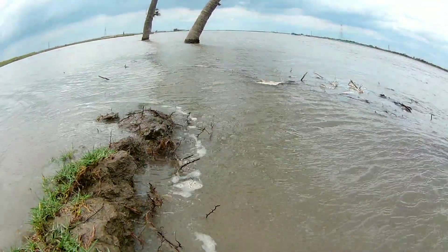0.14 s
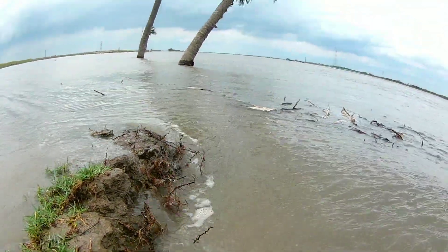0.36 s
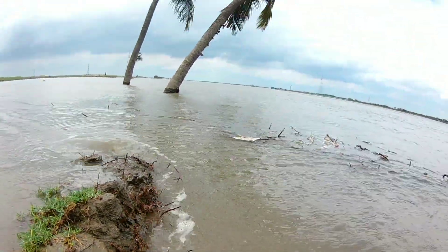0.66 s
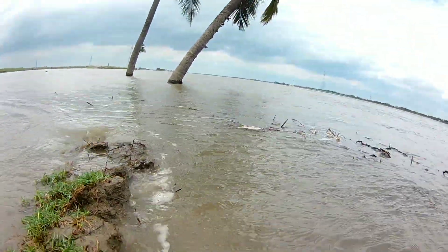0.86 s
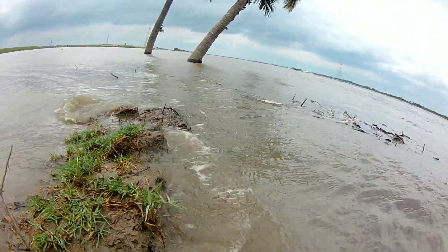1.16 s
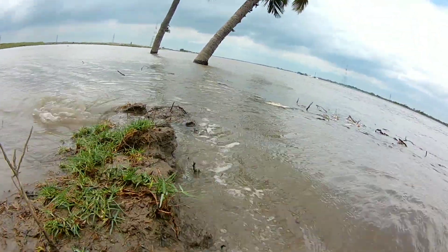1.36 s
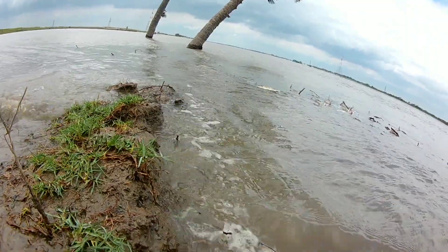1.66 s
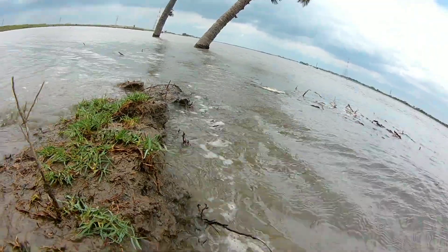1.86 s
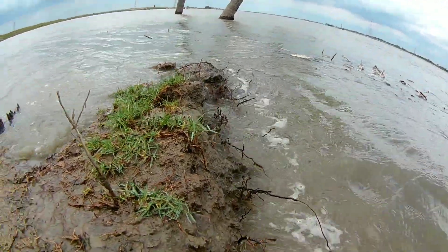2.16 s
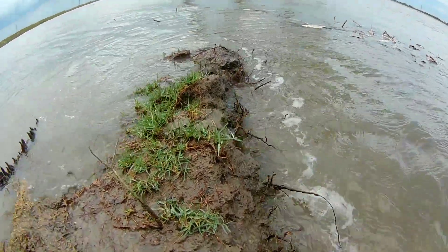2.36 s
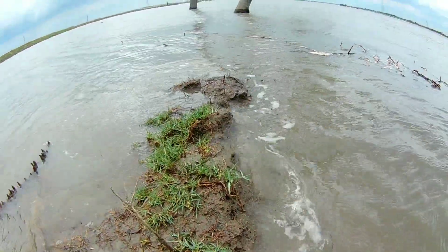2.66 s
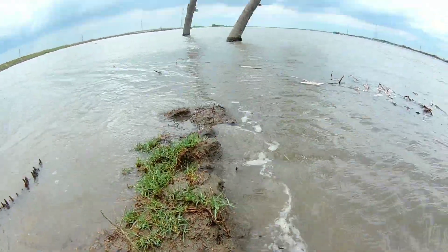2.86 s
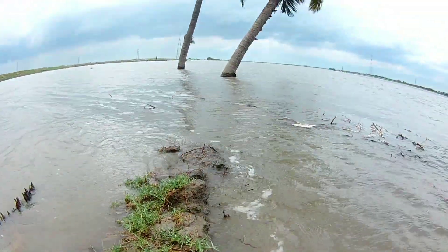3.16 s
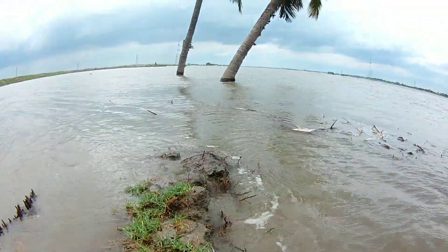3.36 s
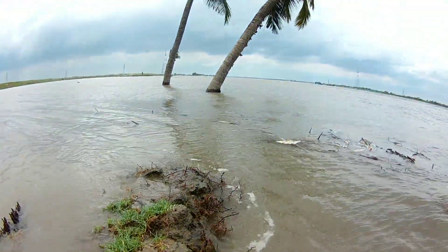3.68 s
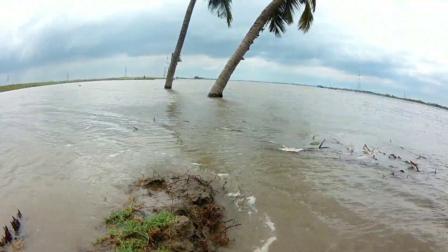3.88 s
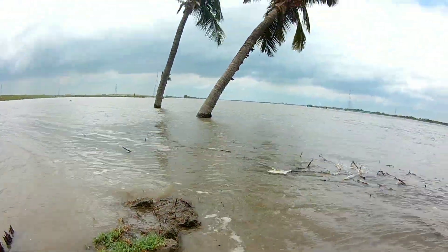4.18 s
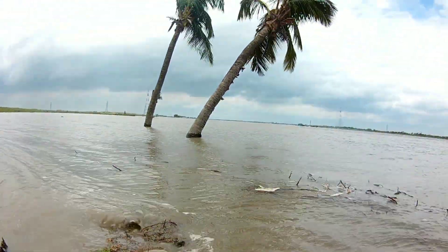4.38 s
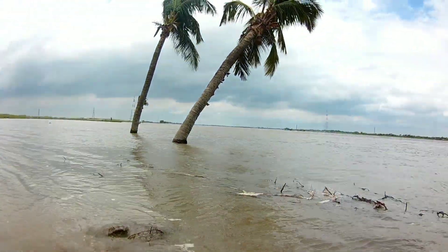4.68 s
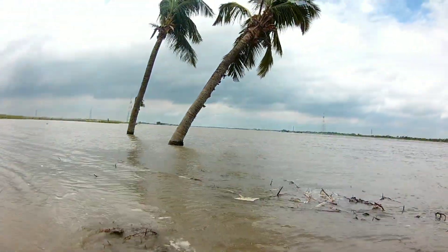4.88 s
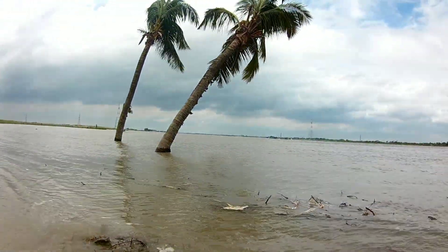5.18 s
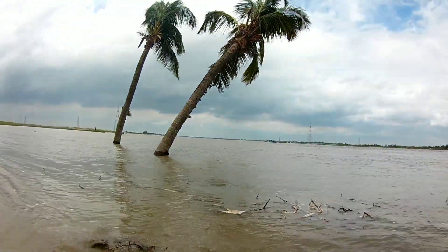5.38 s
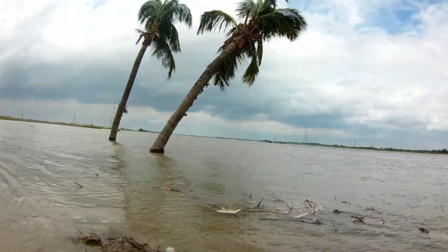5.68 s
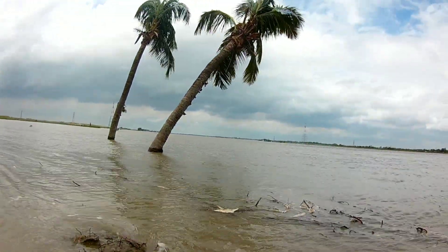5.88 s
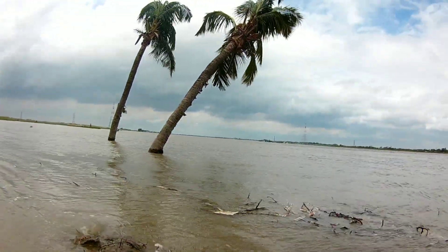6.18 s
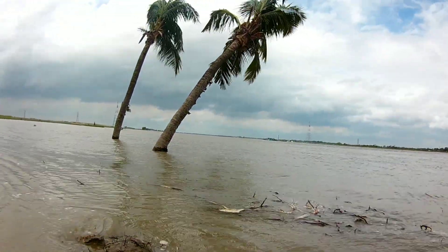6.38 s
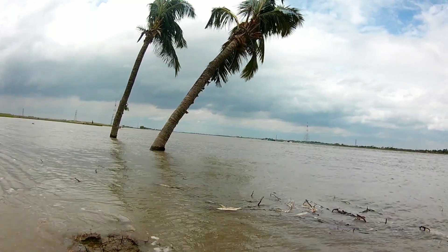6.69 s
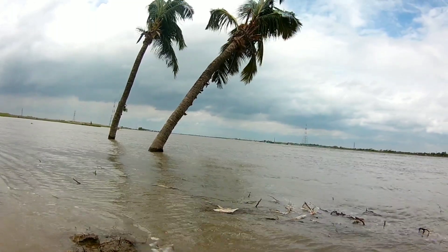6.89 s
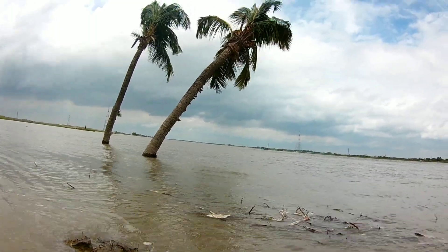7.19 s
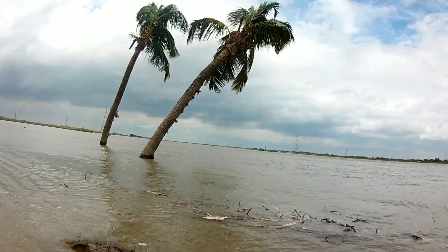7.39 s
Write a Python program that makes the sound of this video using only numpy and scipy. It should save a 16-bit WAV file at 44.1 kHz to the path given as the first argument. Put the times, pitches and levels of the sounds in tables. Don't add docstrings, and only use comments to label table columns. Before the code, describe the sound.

Outdoors at a crumbling mud bank in floodwater, heard close through a small sealed microphone. From 0 to 0.8 s strong wind gusts rumble and thump low, with hard jolts near 0.2 and 0.5-0.7; faint plops hide beneath. Soft gurgles come at about 0.9, then another thumping gust at 1.2. The wind settles to a light fluttering rumble and a gentle watery wash. At 2.1-2.6 a lap breaks into sharp droplet splats, plops and ringing bubbles, with a mild gust at 2.6, then water trickles back until 3.5, ending in a clear plop. It is calmer from 3.6, with isolated bubbles and a plop at 4.5, and a few at 5.4. Around 6.1-6.4 the loudest splash arrives: a wet slap, bright spray and rising gurgles, trickling away by 6.5. Quiet wash, a last droplet at 7.1, and a small gust and plop at 7.4 close it. A faint far drone and hiss persist.

```python
import sys
import numpy as np
from scipy import signal
from scipy.fft import rfft, irfft, next_fast_len
from scipy.io import wavfile
from scipy.ndimage import uniform_filter1d, map_coordinates

SR = 44100
rng = np.random.default_rng(int(sys.argv[2]) if len(sys.argv) > 2 else 0)


def natural_amplitude(level_db):
    exponent = np.asarray(level_db, float) / 20
    return 10 ** exponent


def digitize_waveform(pressure):
    field = np.atleast_2d(pressure).T
    bounded = np.clip(field, -1, 1)
    quanta = np.round(bounded * 32767).astype(np.int16)
    wavfile.write(sys.argv[1], SR, quanta)


N = 332514

# time_s, churn_db, fine_spray_share_db
WATER = [(0, -50, -16.5), (.4, -49, -17.5), (.9, -51, -16), (2.1, -49.5, -18.5), (2.35, -44, -17.5),
         (2.46, -49, -17.5), (2.56, -46.5, -21.5), (3.4, -47.5, -19), (3.63, -49.5, -18.5),
         (4.49, -50, -15), (4.85, -52, -16), (5.6, -49.5, -16), (6.15, -49, -13.5), (6.28, -44, -16.5),
         (6.59, -50, -15.5), (7.05, -48.5, -15), (7.54, -49, -17)]
# pitch_hz, level_db (per Hz)
HOUSING = [(1470, -3), (2500, 0), (3130, -12.5), (3980, 0), (5590, -11.5), (7830, -20), (8500, -20.5),
           (11000, -37.5), (18700, -120)]


def unit(x):
    return x / np.sqrt(np.mean(x ** 2) + 1e-20)


def curves(rows):
    s, *cols = np.transpose(rows)
    return [np.interp(np.arange(N) / SR, s, c) for c in cols]


def wobble(rate):
    knots = rng.standard_normal(int(N * rate / SR) + 4)
    return map_coordinates(knots, [np.arange(N) * rate / SR])


def filtered(x, response):
    m = next_fast_len(N + 8192)
    return irfft(rfft(x, m) * response(np.fft.rfftfreq(m, 1 / SR)), m)[..., :N]


def coloured(x, points):
    f, v = np.transpose(points)
    return filtered(x, lambda hz: natural_amplitude(np.interp(np.log(hz + 1), np.log(f), v)))


def rush(points, patchy_db):
    z = signal.stft(rng.standard_normal(N), nperseg=256)[2]
    field = uniform_filter1d(rng.standard_normal(z.shape), size=4, axis=0)
    field = uniform_filter1d(field, size=12, axis=1)
    patchy = signal.istft(z * natural_amplitude(patchy_db * unit(field)), nperseg=256)[1][:N]
    return unit(coloured(patchy, points))


def scatter(s, waves):
    at = np.round(s * SR).astype(int) + np.arange(waves.shape[1]) + SR
    return np.bincount(at.ravel(), waves.ravel(), N + 2 * SR)[SR:SR + N]


def blips(s, db, hz, life, rise, attack, size):
    t = np.arange(size) / SR
    s, db, hz, life, rise = (np.reshape(v, (-1, 1)) for v in np.broadcast_arrays(s, db, hz, life, rise))
    u = t / life
    swing = np.sin(2 * np.pi * hz * t * (1 + rise * u / 2))
    decay = np.exp(-u - 0.26 * u ** 2)
    return scatter(s, natural_amplitude(db) * swing * decay * (1 - np.exp(-u / attack)))


def bursts(s, db, life, size):
    u = np.arange(size) / SR / life
    noise = rng.standard_normal((len(s), size))
    return scatter(np.c_[s], natural_amplitude(np.c_[db]) * noise * np.exp(-u) * (1 - np.exp(-8 * u)))


def swarm(weight, count, hz, spread, turns, size_db, size):
    when, pitch, big = rng.random((count, 3)).T
    total = np.cumsum(weight)
    s = np.searchsorted(total, when * total[-1]) / SR
    f = hz * np.exp(spread * (2 * pitch - 1))
    return blips(s, -size_db * np.log(big + .03), f, turns / f, .08, .3, size=size)


def steady(x, share):
    swell = np.sqrt(np.abs(uniform_filter1d(x ** 2, size=1300)) + .05)
    return unit(x / swell ** share)


def wind_db():
    # time_s, strength_db
    breeze = [(0, -35), (.4, -31.5), (.82, -42), (.96, -30), (1.45, -35), (2.11, -36), (2.64, -36),
              (2.9, -34), (4.21, -35.5), (4.5, -31), (4.64, -38), (5.13, -34), (5.28, -38), (5.98, -33),
              (6.25, -36.5), (7.2, -36), (7.54, -36)]
    # crest_s, crest_db, rise_s, fall_s (both counted over 20 dB)
    gusts = [(0, -17, .1, 0.048), (.21, -15.5, 0.083, 0.079), (.27, -25.5, .1, 0.14),
             (.505, -21, .05, 0.053), (.56, -21.5, 0.07, 0.31), (.654, -27.5, 0.25, 0.31),
             (1.208, -19, 0.12, .13), (1.348, -37, 0.089, 0.079), (2.18, -32, 0.12, 0.1),
             (2.64, -25.5, 0.63, 0.17), (7.39, -28.5, 0.14, 0.1)]
    t = np.arange(N) / SR
    power = natural_amplitude(2 * curves(breeze)[0])
    for s, db, rise, fall in gusts:
        power = power + natural_amplitude(2 * db - 40 * np.maximum((s - t) / rise, (t - s) / fall))
    return 10 * np.log10(power)


def wind_jolts():
    # peak_s, peak_db, width_ms
    jolts = [(0.01, -14, 1.7), (0.19, -29, 1.8), (0.2092, -5, 1.78), (0.504, -12, 1.2), (.553, -8.5, 2),
             (0.628, -12, 0.51), (0.6416, -15, 1.1), (.66, -11.5, 0.87), (0.704, -15.5, 1.5),
             (1.169, -24.5, 1.4), (1.191, -15, 2.6), (1.235, -15.5, 0.9), (1.26, -21.5, 2.5),
             (1.2118, -8.5, 2.04), (2.646, -23.5, 3)]
    s, db, ms = np.transpose(jolts)[:, :, None]
    lead = .02
    u = (np.arange(1800) / SR - lead) / (ms / 1000)
    push = np.exp(-np.abs(u) ** 1.63) - 0.13 * np.exp(-(u / 6.6) ** 2)
    return scatter(s - lead, natural_amplitude(db + 1.5) * push)


def wind():
    # pitch_hz, level_db (per Hz)
    rumble_colour = [(8.8, -47), (15, -16), (60, 0.5), (117, -2.5), (151, -5), (214, -10), (300, -28),
                     (390, -31.5), (660, -120)]
    # pitch_hz, level_db (per Hz)
    eddy_colour = [(100, -35), (200, 0), (300, 5), (600, -8.5), (1200, -18), (2500, -69)]
    rumble_db = wind_db()
    eddy_db = -46.5 + (rumble_db + 35)
    gusty = np.clip((rumble_db + 41) / 15, .15, 1)
    rumble = steady(rush(rumble_colour, patchy_db=0.53), gusty)
    rumble = rumble + 0.76 * gusty * unit(filtered(rumble, lambda f: f < 45))
    eddies = unit(natural_amplitude(1.8 * wobble(70)) * steady(rush(eddy_colour, patchy_db=-0.3), gusty))
    flutter = natural_amplitude((1 - gusty) * (1.76 * wobble(9) + 1.28 * wobble(25)))
    turbulence = natural_amplitude(rumble_db - 4) * rumble + natural_amplitude(eddy_db - 2.5) * eddies
    return flutter * turbulence + wind_jolts()


def drone():
    # pitch_hz, width_hz, level_db
    lines = [
        (52, 8.3, -44),
        (89.2, 16, -46),
        (126.9, 9.3, -49),
        (192, 7.5, -50.5),
    ]
    total = 0
    for hz, width, db in lines:
        band = filtered(rng.standard_normal(N), lambda f: np.exp(-((f - hz) / width) ** 2))
        total = total + natural_amplitude(db) * unit(band)
    return total


def wash():
    # pitch_hz, level_db (per Hz)
    wash_colour = [(150, -32), (250, -0.5), (294, -14), (327, -11), (488, -7.5), (661, -4), (705, -6),
                   (1650, -11.5), (3300, -30), (4290, -47), (7260, -120)]
    wash_db, share_db = curves(WATER)
    spray_db = wash_db + share_db
    clumps, ripple = natural_amplitude(6 * wobble(16)), wobble(14)
    body = natural_amplitude(-50.5 + 0.33 * (wash_db + 52.0) + 0.95 * ripple) * rush(wash_colour, patchy_db=0.5)
    fizz = natural_amplitude(-66.0 + 0.65 * (spray_db + 70) + 0.12 * ripple) * rush(HOUSING, patchy_db=1.7)
    gurgle = swarm(clumps * natural_amplitude(4.5 * wash_db), count=260, hz=1200, spread=.55, turns=5, size_db=3, size=1400)
    spray = swarm(clumps * natural_amplitude(4 * spray_db), count=700, hz=4900, spread=0.45, turns=1.6, size_db=3.5, size=120)
    return body + fizz + natural_amplitude(-42.5) * gurgle + natural_amplitude(-71.0) * unit(coloured(spray, HOUSING))


def mist():
    # pitch_hz, level_db (per Hz)
    mist_colour = [(8200, -120), (8800, -9), (9500, -1), (10500, -9), (12000, -120)]
    share_db = curves(WATER)[1]
    return natural_amplitude(-88 + 2 * (share_db + 17)) * rush(mist_colour, patchy_db=1.5)


def pockets():
    # start_s, peak_db, pitch_hz
    plop_rows = [(.314, -28.5, 1800), (0.439, -34, 1570), (.438, -29.5, 940), (0.847, -31.5, 1700),
                 (1.66, -35.5, 1700), (1.994, -34, 710), (2.104, -34.5, 816), (2.135, -34, 1750),
                 (2.287, -33, 1440), (2.325, -24.5, 850), (2.354, -33, 1660), (2.378, -27, 1080),
                 (2.385, -31, 2160), (2.387, -28, 1230), (2.87, -32, 1510), (3.367, -40, 960),
                 (3.422, -31.5, 1680), (3.476, -22, 1030), (3.52, -27.5, 740), (4.245, -36, 1690),
                 (4.538, -22.5, 830), (5.905, -36.5, 765), (6.128, -35, 1640), (6.158, -34, 1280),
                 (6.183, -23, 650), (6.183, -20, 1140), (6.238, -23, 2240), (6.245, -15, 890),
                 (6.279, -46, 2200), (7.386, -33, 700)]
    # start_s, peak_db, pitch_hz
    bead_rows = [(.314, -56, 2777), (.814, -42.5, 2530), (1.736, -47.5, 3050), (2.278, -43, 2030),
                 (2.518, -47, 2510), (2.601, -44, 1780), (2.689, -42, 2200), (2.709, -46, 2840),
                 (2.823, -42.5, 1480), (2.847, -40, 1450), (2.866, -47, 2790), (2.913, -43, 2030),
                 (3.07, -46, 2230), (3.124, -43, 2260), (3.126, -40, 1470), (3.167, -40.5, 2290),
                 (3.18, -45, 1210), (3.228, -48, 2200), (3.246, -45, 2180), (3.324, -37, 1680),
                 (3.499, -39, 1830), (3.614, -48.5, 2430), (4.343, -40.5, 1680), (4.565, -38, 1830),
                 (5.374, -41.5, 2900), (5.377, -47, 2270), (6.09, -45.5, 2170), (6.329, -45, 1940),
                 (6.373, -37, 1070), (6.56, -52, 2800)]
    # start_s, peak_db, pitch_hz, life_ms
    bubble_rows = [(0.631, -30.5, 1150, 3.3), (.844, -32, 433, 14), (.908, -36, 980, 3.4),
                   (0.983, -39.5, 1220, 2.3), (2.335, -33, 1810, 4.7), (2.41, -33, 1630, 6.9),
                   (2.414, -28.5, 900, 2.3), (2.499, -30, 945, 7.6), (2.521, -32, 1710, 4.4),
                   (2.524, -31.5, 1404, 7.9), (2.544, -34, 583, 18), (2.545, -36.5, 1190, 10),
                   (2.66, -32, 1040, 5), (2.785, -31.5, 1400, 6), (2.869, -35, 660, 6.5),
                   (2.994, -35, 945, 4.8), (3.069, -38.5, 1266, 16), (3.307, -36, 1290, 4.7),
                   (3.398, -29.5, 1870, 3.9), (3.476, -40, 1630, 2.7), (3.532, -33, 1210, 5.2),
                   (3.549, -41, 1040, 8.3), (3.838, -38, 1000, 8.2), (3.876, -34.5, 1450, 7.3),
                   (4.278, -35.5, 860, 5.7), (4.526, -27.5, 960, 5.9), (5.375, -31, 1250, 6),
                   (6.092, -30.5, 885, 6.6), (6.169, -34, 1266, 12), (6.438, -34, 1175, 9.9)]
    s, db, hz = np.transpose(plop_rows)
    plop_cycles = 2.67 * natural_amplitude(-0.3 * (db + 30))
    plops = s, db, hz, plop_cycles / hz
    s, db, hz = np.transpose(bead_rows)
    beads = s, db, hz, 9.7 / hz
    s, db, hz, life_ms = np.transpose(bubble_rows)
    ringing = s, db, hz, life_ms / 1000
    return np.hstack([plops, beads, ringing])


def bubbles_and_plops():
    s, db, hz, life = pockets()
    rise = 0.06 * (1000 / hz) ** 1.54
    bubbles = blips(s, db + 6, hz, life, rise, .3, size=3000) * natural_amplitude(1.7 * wobble(300))

    def dull(f):
        low_cut = (f / 500) ** 2 / (1 + (f / 500) ** 2)
        return low_cut / (1 + (f / 1800) ** 4)

    return bubbles + filtered(bursts(s, db + 4.0, 0.0045, size=400), dull)


def splats():
    # start_s, peak_db, centre_hz
    hits = [(.4564, -45, 3820), (.846, -54, 3630), (1.735, -48, 3700), (2.135, -42.5, 4050),
            (2.2177, -36.5, 4370), (2.257, -36, 4300), (2.2677, -29.5, 4700), (2.329, -38, 3700),
            (2.353, -41, 3900), (2.388, -27, 4220), (2.43, -45, 4300), (2.551, -47, 3710),
            (2.5745, -46, 3540), (3.251, -46, 3650), (3.271, -43, 4340), (3.4762, -36, 3780),
            (3.487, -36.5, 4750), (3.513, -45, 3780), (4.093, -46, 4500), (4.317, -40, 4130),
            (5.243, -42, 3800), (5.892, -38.5, 3700), (6.0885, -38, 3740), (6.1265, -43, 3990),
            (6.184, -36.5, 4050), (6.1966, -32, 4100), (6.2385, -19.5, 3370), (6.251, -40, 4200),
            (6.4365, -47, 3960), (7.1126, -40, 3770)]
    s, db, hz = np.transpose(hits)
    tick = blips(s, db - 3.0, hz * 1.15, 0.0013, 0, .25, size=200)
    tick = tick + blips(s, db, 3975, 0.0011, 0, .25, size=400)
    puff = bursts(s, db, 0.0011, size=600) + bursts(s + 0.0011, db - 9.0, 0.0037, size=2500)
    through_port = tick + natural_amplitude(5.5) * coloured(puff, HOUSING)
    leak = natural_amplitude(-32) * filtered(puff, lambda f: f > 8500)
    return filtered(through_port, lambda f: 1 / (1 + (f / 6800) ** 12)) + leak


def glides():
    # start_s, level_db, start_hz, end_hz, length_s
    gurgles = [
        (0.899, -46, 750, 1100, 0.04),
        (0.967, -45.5, 1018, 1500, 0.039),
        (2.87, -42, 668, 835, 0.037),
        (2.962, -38.5, 827, 1123, 0.05),
        (3.875, -48.5, 1460, 1910, 0.03),
        (4.554, -49, 1574, 2210, .03),
        (6.273, -38.5, 665, 1106, 0.042),
        (6.375, -41, 480.5, 1497, .095),
    ]
    s, db, low_hz, high_hz, span = np.transpose(gurgles)[:, :, None]
    u = np.minimum(np.arange(5000) / SR / span, 1)
    ratio = high_hz / low_hz
    turns = span * low_hz * (ratio ** u - 1) / np.log(ratio)
    tone = np.sin(np.pi * u) ** .5 * np.sin(2 * np.pi * turns)
    return scatter(s, natural_amplitude(db) * tone) * natural_amplitude(2.0 * wobble(90))


def trickle():
    # start_s, length_s, density (0-1)
    spills = [
        (2.1, 1.45, 1),
        (4.25, .35, .4),
        (5.88, .6, 1),
    ]
    t = np.arange(N) / SR
    flow = sum(dense * (t > s) * (t < s + span) for s, span, dense in spills)
    running = natural_amplitude(4 * wobble(25)) * flow
    bubbles = swarm(running, count=300, hz=1150, spread=.6, turns=7, size_db=2.5, size=900)
    ticks = swarm(running, count=200, hz=4400, spread=.3, turns=3, size_db=3.5, size=160)
    return natural_amplitude(-43.5) * bubbles + natural_amplitude(-57) * ticks


def scene():
    air = wind() + drone()
    water = wash() + mist() + bubbles_and_plops() + splats() + glides() + trickle()
    return (air + water)[None]


def roll_off(x):
    return signal.sosfilt(signal.butter(12, 16750, fs=SR, output="sos"), x)


def record(dry):
    # pitch_hz, level_db (per Hz)
    hiss_colour = [(3530, -28), (6000, -2), (6840, -2), (8050, -15), (8710, -3.5), (11500, -3.5),
                   (15500, -0.5)]
    noisy = dry + natural_amplitude(-72.5) * rush(hiss_colour, patchy_db=.1)
    mix = filtered(noisy, lambda hz: hz < 15750)
    return roll_off(mix)


dry = scene()
out = record(dry)
digitize_waveform(out)
```